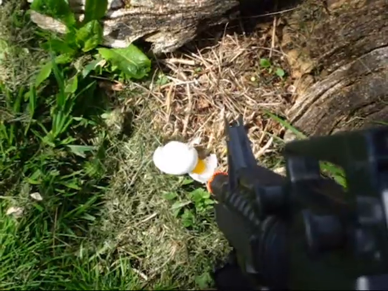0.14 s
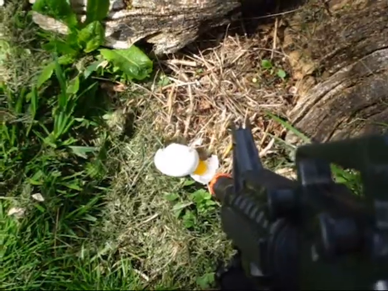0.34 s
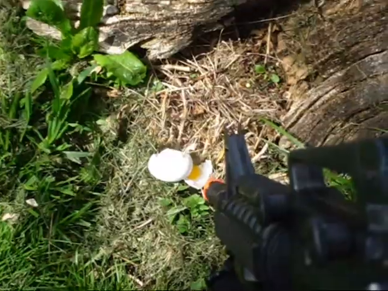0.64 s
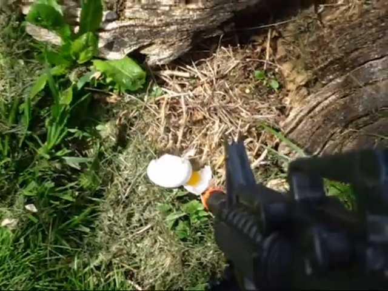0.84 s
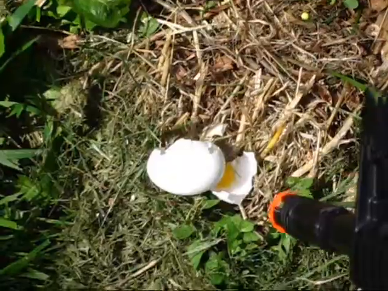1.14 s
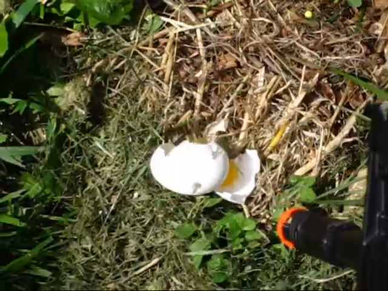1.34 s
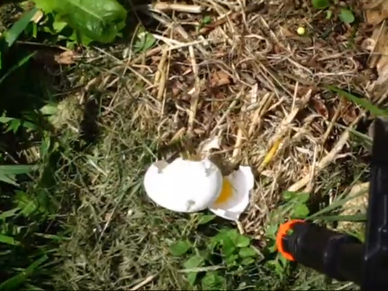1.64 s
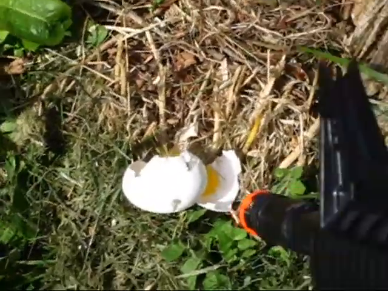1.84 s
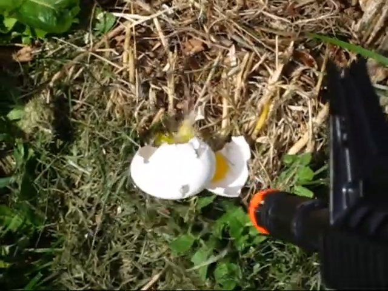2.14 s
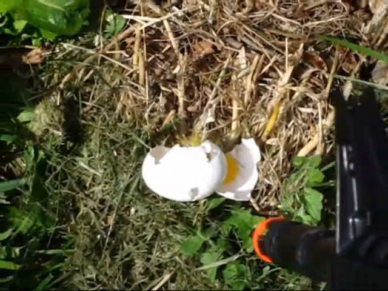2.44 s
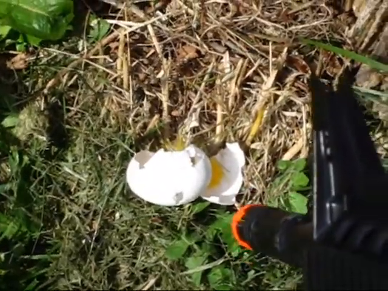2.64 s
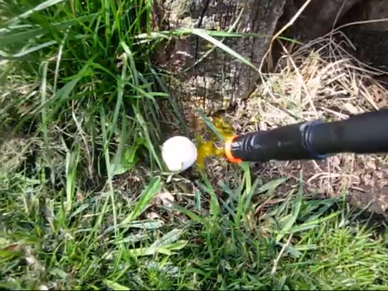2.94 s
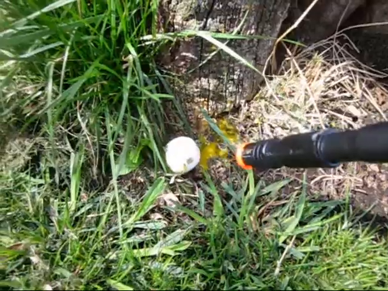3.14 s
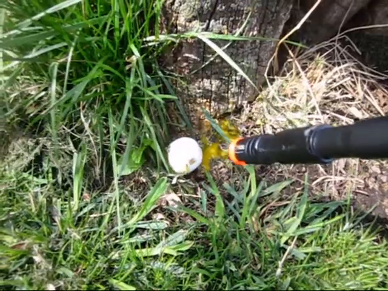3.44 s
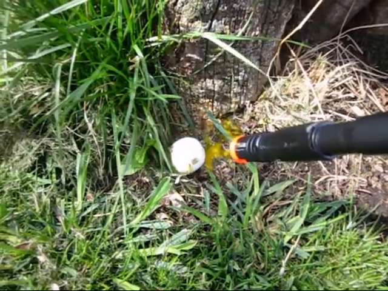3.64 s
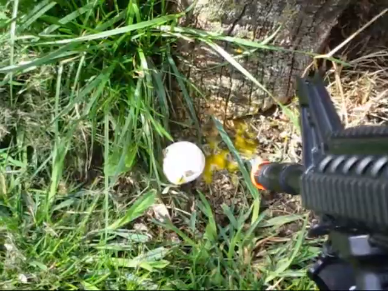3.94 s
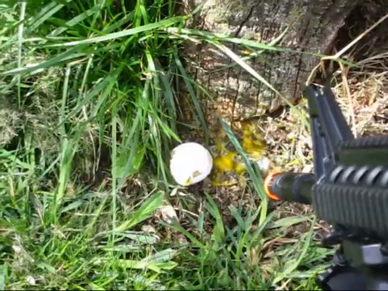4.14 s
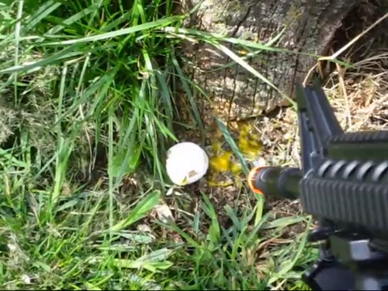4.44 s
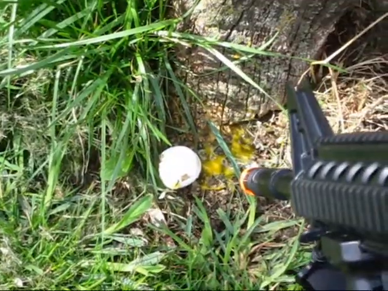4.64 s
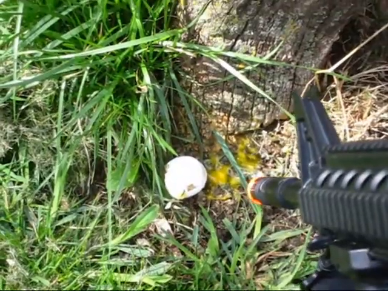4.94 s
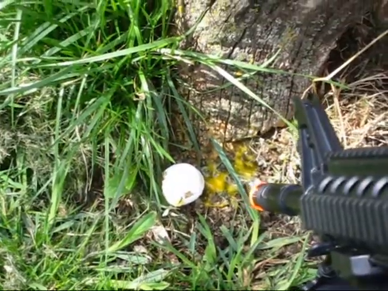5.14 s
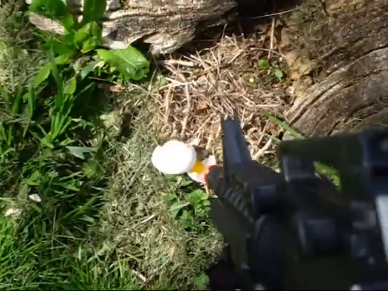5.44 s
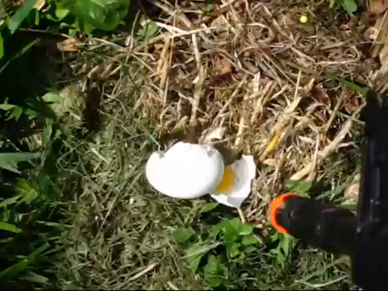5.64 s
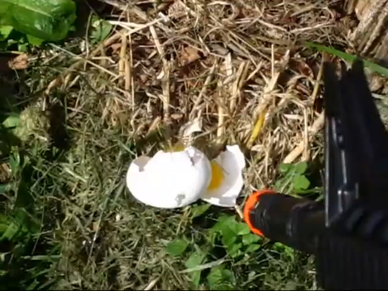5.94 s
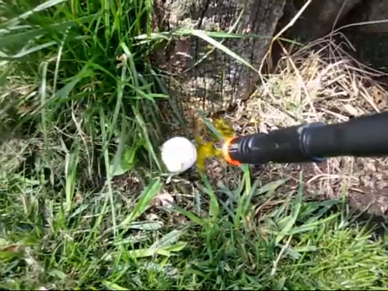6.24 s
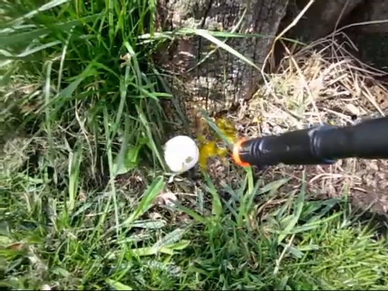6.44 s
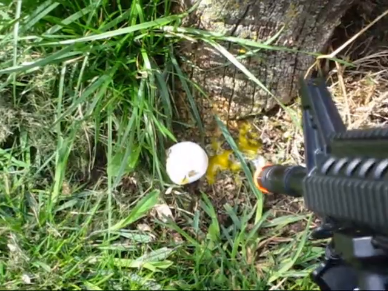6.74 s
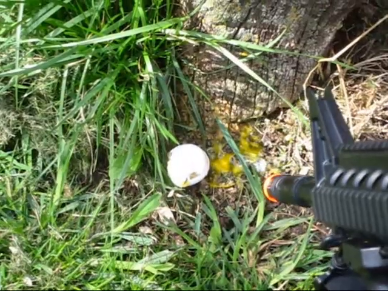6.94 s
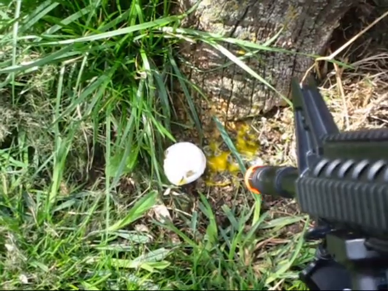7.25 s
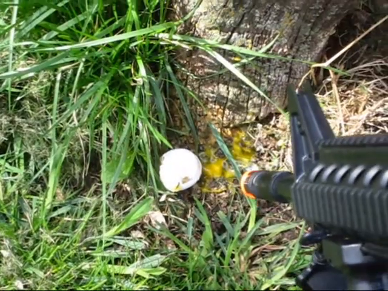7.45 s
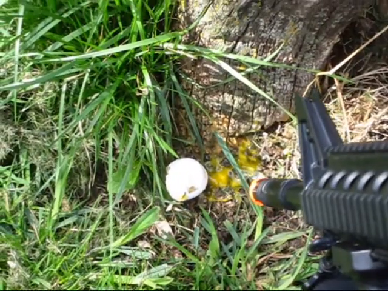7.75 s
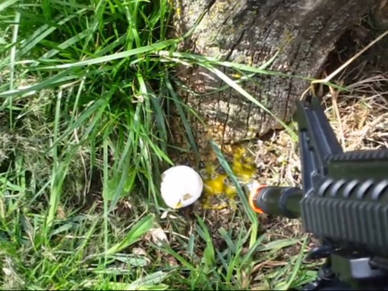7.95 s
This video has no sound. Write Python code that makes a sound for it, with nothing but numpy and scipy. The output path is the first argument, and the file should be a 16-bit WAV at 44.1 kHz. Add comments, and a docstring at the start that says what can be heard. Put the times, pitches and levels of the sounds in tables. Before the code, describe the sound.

An airsoft rifle fires five sharp plastic clacks with metallic spring ring, outdoors up close, then the five shots repeat quickly.

```python
"""A spring airsoft rifle fires five shots on a lawn, right beside the microphone; then all five are repeated.
Each shot is a double clack of the piston in a plastic body (filtered noise), a short buzz of the spring
(noise ticks) and a long faint ring (decaying sines and a haze of weak modes).
An automatic gain control ducks the breeze (filtered noise) at each shot and lets it swell back.
The rifle clicks as it is handled (filtered impulses); a far bird whistles (gliding sines)."""
import sys
import numpy as np
from scipy import signal
from scipy.fft import rfft, irfft
from scipy.io import wavfile
from scipy.ndimage import uniform_filter1d

SR = 44100
rng = np.random.default_rng(int(sys.argv[2]) if len(sys.argv) > 2 else 0)


def file_out(sig):
    """Save sig as 16-bit WAV at sys.argv[1]."""
    # one column per channel
    cols = np.atleast_2d(sig).T
    # limit, then scale
    lim = np.clip(cols, -1, 1)
    pcm = np.round(lim * 32767).astype(np.int16)
    wavfile.write(sys.argv[1], SR, pcm)


N = 357651
TIME_S = np.arange(N) / SR
CUTOFF_HZ = 15600

# sections, each with its own steady breeze: (begins [s], rumble level [dB], rustle level [dB])
SECTIONS = [(0, -49, -45), (1.1, -45.5, -45.5), (2.94, -45, -45.5), (4.016, -42, -44.5)]
# repeats, each running until the next: (begins [s], source time [s])
REPEATS = [(5.44, 0.0006), (5.718, 1.1376), (5.918, 1.9469), (6.317, 2.9569), (6.72, 3.9888)]
SECTION_ENDS = [round(row[0] * SR) for row in SECTIONS[1:] + REPEATS[:1]]  # samples


def from_db(db):
    """Decibels to gain."""
    return 10 ** (np.asarray(db) / 20)


def rms_one(x):
    """Scale to unit power."""
    return x / np.sqrt(np.mean(x ** 2) + 1e-20)


def add(out, start_s, sound):
    """Mix a sound in at start_s, as far as there is room."""
    at = max(round(start_s * SR), 0)
    part = sound[:max(len(out) - at, 0)]
    out[at:at + len(part)] += part


def drift(knots_per_s):
    """Random curve of unit rms: straight lines between random knots."""
    knots = rng.standard_normal(1000)
    return rms_one(np.interp(TIME_S * knots_per_s, np.arange(len(knots)), knots))


def colour(x, spectrum, resonances=(), size=8192):
    """Minimum-phase filter of unit power gain: a smooth spectrum with resonant peaks or dips."""
    hz = np.arange(size // 2 + 1) * SR / size + 1e-3
    points = np.array(spectrum)
    db = np.interp(np.log(hz), np.log(points[:, 0]), points[:, 1])
    for centre_hz, width_hz, peak_db in resonances:
        db = db + peak_db / (1 + (2 * (hz - centre_hz) / width_hz) ** 2)
    # folding the cepstrum makes the response causal
    cepstrum = irfft(np.log(from_db(db)))
    cepstrum[1:size // 2] *= 2
    cepstrum[size // 2 + 1:] = 0
    response = irfft(np.exp(rfft(cepstrum)))
    return signal.fftconvolve(x, response / np.linalg.norm(response))[:len(x)]


def decay(t, start_s, length_s):
    """Sudden rise, exponential fall to 1/e in length_s."""
    return (t >= start_s) * np.exp(-np.maximum(t - start_s, 0) / length_s)


def breeze(lumpy_db=1.5, flutter_db=0.93, rustle_follows=0.21):
    """Eddies rumble on the microphone and stir the grass; gusts swell the rumble far more than the rustle."""
    # gusts: (peak time [s], half-length to 1/e [s], rise [dB])
    gusts = [(1.151, 0.13, 5.5), (2.01, .18, 3), (2.99, .06, 7), (3.697, .09, 5.5), (4.056, 0.035, 8),
             (4.7, 0.18, 1.5)]
    # rumble colour: (frequency [Hz], level [dB])
    rumble_colour = [(15, -47.5), (25, -8.5), (43, -4.5), (65, -2), (81, 2.5), (151, -1), (243, -7),
                     (321, -17.5), (400, -27), (520, -41), (880, -120)]
    # grass rustle colour: (frequency [Hz], level [dB])
    rustle_colour = [(180, -29.5), (300, -1), (1010, -0.5), (2570, -13.5), (2980, -11.5), (3400, -15),
                     (4020, -11.5), (5160, -21), (8090, -18.5), (8640, -21), (13300, -24), (15200, -22.5),
                     (16000, -47.5)]
    section = np.searchsorted(SECTION_ENDS[:-1], np.arange(N), "right")
    _, rumble_db, rustle_db = np.array(SECTIONS)[section].T
    gust_db = sum(db * np.exp(-((TIME_S - peak_s) / length_s) ** 2) for peak_s, length_s, db in gusts)
    eddies = drift(25)
    rumble_gain = from_db(rumble_db + gust_db + lumpy_db * eddies)
    rumble = rumble_gain * colour(rng.standard_normal(N), rumble_colour)
    rustle_gain = from_db(rustle_db + rustle_follows * gust_db + flutter_db * eddies)
    rustle = rustle_gain * colour(rng.standard_normal(N), rustle_colour)
    return (rumble + rustle) * (np.arange(N) < SECTION_ENDS[-1])


def bang(t, side, stretch, bang_db, puff_db, band, puff_s=0.00341, puff_width_s=0.00019, repeat=0.35):
    """The piston's contacts rattle the body, partly alike; the air leaves the muzzle as one N-shaped puff."""
    # sear, piston slam, chatter, rebound, chatter: (unstretched time after release [s], level [dB], decay [s])
    stroke = [(0.0, -9.5, 0.0061), (0.003, 0.5, 0.0048), (0.0068, 0, 0.0039), (0.0142, 1.5, 0.0046),
              (0.0188, -2.5, 0.003)]
    # bang colour from behind: (frequency [Hz], level [dB])
    behind_colour = [(35, -42), (60, -8), (553, -6.5), (822, -2.5), (1550, -3), (2190, 3.5), (2900, -4),
                     (3670, -2.5), (4640, -7.5), (6140, -8), (10000, -12.5), (11300, -20.5), (14600, -15.5),
                     (16000, -12.5)]
    # bang colour from the side, duller: (frequency [Hz], level [dB])
    side_colour = [(35, -15), (80, -6), (240, -5.5), (370, -21.5), (590, -8), (780, -7), (1200, -1),
                   (1500, -14), (2000, -3.5), (2800, -9), (4300, -13.5), (9800, -16.5), (11800, -23),
                   (14600, -16), (16000, -45)]
    # body resonances and hollows from behind: (frequency [Hz], width [Hz], level [dB])
    behind_body = [(467, 57, 5), (669, 21, 6.5), (811, 33, 8), (1310, 140, -1.5), (1623, 55, -5.5),
                   (1820, 170, 3.5), (1915, 63, 2.5), (2250, 130, -4), (2600, 120, -2), (3090, 73, -0.5),
                   (3530, 140, 1), (4090, 190, 5), (4340, 60, 5), (4850, 74, 3), (5750, 78, 9.5),
                   (6280, 56, 7)]
    # body resonances and hollows from the side: (frequency [Hz], width [Hz], level [dB])
    side_body = [(262, 51, 8.5), (457, 60, 5), (754, 48, 7.5), (1120, 200, 5), (1530, 140, -15),
                 (1900, 160, 8), (1980, 140, 2.5), (2670, 100, 10.5), (3120, 120, 8.5), (5160, 82, 11),
                 (6430, 70, -8), (8610, 61, 13)]
    alike = np.clip(repeat, 0, 1)
    force = np.zeros(len(t))
    common = rng.choice([-1, 1], len(t))
    for contact_s, db, length_s in stroke:
        grain = np.sqrt(alike) * common + np.sqrt(1 - alike) * rng.choice([-1, 1], len(t))
        add(force, contact_s * stretch, from_db(db) * grain * decay(t, 0, length_s))
    force *= np.minimum(t / stroke[1][0], 1)  # the scrape grows as the piston gathers speed
    spectrum, body = (side_colour, side_body) if side > .5 else (behind_colour, behind_body)
    rattle = from_db(bang_db) * colour(force, spectrum, [*body, band])
    u = (t - puff_s) / puff_width_s
    puff = -from_db(puff_db) * u * np.exp((1 - u ** 2) / 2)
    return rattle + puff


def buzz_envelope(t, attack_s=0.019, settles_s=0.094):
    """The slack spring's buzz builds up, is kicked by the rebound, thrashes until it settles, then trembles."""
    rise_db_per_s, kick_fall_db_per_s, fall_db_per_s, settle_db_per_s = 1550, 600.5, 92.5, 323
    kick_db, thrash_db, tremor_db = 5.5, 1.5, -10.5
    early_s, late_s = np.maximum(attack_s - t, 0), np.maximum(t - attack_s, 0)
    settled_s = np.maximum(t - settles_s, 0)
    kick = from_db(kick_db - kick_fall_db_per_s * late_s)
    thrash = from_db(thrash_db - fall_db_per_s * late_s - settle_db_per_s * settled_s)
    tremor = from_db(tremor_db - fall_db_per_s * late_s)
    return from_db(-rise_db_per_s * early_s) * np.sqrt(kick ** 2 + thrash ** 2 + tremor ** 2)


def buzz(t, side, clash_hz=85, throb_db=0.2, grain_db=2.0):
    """The coils clash in dense ticks, in slight surges as the spring swings to and fro."""
    # buzz colour from behind: (frequency [Hz], level [dB])
    behind_colour = [(150, -47.5), (250, -14.5), (460, -9.5), (618, 0), (674, -3.5), (831, 0.5),
                     (922, -9.5), (1040, -4.5), (3770, -3), (4340, -2), (7840, -7), (10400, -16.5),
                     (14900, -16), (16000, -13.5)]
    # buzz colour from the side: (frequency [Hz], level [dB])
    side_colour = [(150, -40), (250, -16), (476, -12), (519, -2.5), (566, -15), (618, -1), (674, 1.5),
                   (1330, -5.5), (1980, -0.5), (3120, -6.5), (3460, 0.5), (4340, -8), (8700, -12),
                   (16000, -20.5)]
    noise = rng.standard_normal(len(t))
    grain = np.repeat(rng.standard_normal(len(t)), 24)[:len(t)]  # held for 24 samples
    ticks = rms_one(noise * from_db(grain_db * grain))
    surge_db = throb_db * np.sin(2 * np.pi * (clash_hz * t + rng.random()))
    return colour(ticks * buzz_envelope(t) * from_db(surge_db), side_colour if side > .5 else behind_colour)


def spring_ring(t, modes, spread_db=2.0):
    """Long decaying modes of the spring, each struck with a random strength and phase."""
    chance = rng.standard_normal((len(modes), 2))
    ring = np.zeros(len(t))
    for (hz, rms_db, t60_s), (strength, phase) in zip(modes, chance):
        gain = np.sqrt(2) * from_db(rms_db + spread_db * strength - 60 * t / t60_s)
        ring += gain * np.sin(2 * np.pi * (hz * t + phase))
    return ring


def shimmer(t, level_db=-34, t60_s=1.84, count=700):
    """Hundreds of weak coil modes blur into a metallic haze."""
    # haze colour: (frequency [Hz], level [dB])
    haze_colour = [(400, -41), (700, -19), (1400, -5), (2200, -1.5), (3500, -5), (6000, -22.5),
                   (9000, -9.5), (12000, -19.5), (15000, -17), (16000, -31.5)]
    # bands where the coil modes crowd: (frequency [Hz], width [Hz], level [dB])
    coil_bands = [(2250, 200, 3), (4560, 450, 7.5), (7520, 600, 10.5)]
    lines = np.zeros(len(t) // 2 + 1, complex)
    at = (rng.random(count) * len(lines)).astype(int)
    lines[at] = rng.standard_normal(count) + 1j * rng.standard_normal(count)
    haze = rms_one(colour(irfft(lines, len(t)), haze_colour, coil_bands))
    return haze * from_db(level_db - 60 * t / t60_s)


def shots(band_width=0.45):
    """Each shot favours one body band and one spring mode; its ring is cut off where the section ends."""
    # shots: (time [s], bang level [dB], heard from behind 0 or side 1, stroke duration factor, puff level [dB],
    #   buzz level [dB], ring level [dB], favoured spring mode [Hz], its boost [dB],
    #   favoured body band [Hz], its boost [dB])
    shot_rows = [(0.0109, 10.5, 0, 0.95, 1.5, -10, -4.5, 710.6, 12.5, 1600, 4),
                 (1.2103, 8.5, 0, 0.94, -1, -12, -1.5, 1415, 7, 800, 1.5),
                 (2.1740, 11.5, 0, 1.09, 5, -5.5, -11, 1911, 17.5, 4800, -0.5),
                 (3.0708, 10.5, 1, 0.92, 13.5, -9, 2, 1415, 19, 3300, 2.5),
                 (4.0617, 7, 0, 0.99, 6, -9, 1, 850.6, 8, 248, 11)]
    # spring modes: (frequency [Hz], level from behind [dB], level from the side [dB], t60 [s])
    spring_modes = [(710.6, -51.5, -51, 2.7), (850.6, -39.5, -45, 1.78), (861.3, -45.5, -42, 1),
                    (984, -46.5, -45.5, 1.5), (1060, -42.5, -50, 1.2), (1138, -43.5, -67, 3.2),
                    (1266, -40.5, -58, 1.5), (1415, -44.5, -55.5, 1.69), (1810, -44, -28.5, 0.77),
                    (1911, -46, -45, 1.84), (2060, -50, -30, 0.78), (2200, -48.5, -32, 1.35),
                    (2190, -48, -38, 0.61), (2254, -46, -55, 2.95), (2455, -50, -52, 1.1),
                    (2640, -42.5, -42, 1.34), (2780, -53, -42, 1.34), (3550, -47.5, -40, 1.06),
                    (3700, -54, -44, 1.3), (4100, -41.5, -56, 1.5), (4360, -52.5, -60, 1.4),
                    (4560, -38, -52, 0.98), (4800, -43.5, -48, 1.4), (7200, -48, -57, 1.4),
                    (7590, -51, -57, 1.2), (8300, -53, -48, 1.5), (9733, -61, -49, 1.5),
                    (10866, -48, -54, 1.7), (14266, -59, -49, 1.6)]
    out, t = np.zeros(N), TIME_S[:SR * 3 // 2]
    hz, behind_db, side_db, t60_s = np.transpose(spring_modes)
    for (start_s, bang_db, side, stretch, puff_db, buzz_db, ring_db,
         tone_hz, boost_db, band_hz, band_db) in shot_rows:
        favoured = np.arange(len(hz)) == np.argmin(np.abs(hz - tone_hz))
        mode_db = (side_db if side > .5 else behind_db) + boost_db * favoured
        ring = from_db(ring_db) * spring_ring(t, np.transpose([hz, mode_db, t60_s])) + shimmer(t)
        band = (band_hz, band_width * band_hz, band_db)
        clack = bang(t, side, stretch, bang_db, puff_db, band)
        shot = clack + from_db(buzz_db) * buzz(t, side) + ring
        end = min(end for end in SECTION_ENDS if end > start_s * SR)
        add(out[:end], start_s, shot)
    return out


def bird(droop=.08):
    """Thin far whistles that lift a little, then fall away."""
    # whistles: (time [s], length [s], highest pitch [Hz], level [dB])
    whistles = [(0.882, 0.093, 3870, -52), (1.86, .14, 3750, -56), (4.677, 0.24, 3420, -55)]
    out = np.zeros(N)
    for start_s, length_s, hz, db in whistles:
        u = np.linspace(0, 1, round(length_s * SR))
        pitch_hz = hz * (1 - droop * (1.9 * u - .5) ** 2)
        add(out, start_s, from_db(db) * np.sin(np.pi * u) * np.sin(2 * np.pi * np.cumsum(pitch_hz) / SR))
    return out


def slips(count=3, last_s=3.8672, gap_s=0.0122):
    """A stiff part slips before it snaps home: a run of scraping clicks that grow louder and brighter."""
    last_db, step_db, decay_s = -21.5, 6, 0.0085
    dull_hz, dull_ratio = 9000, 0.48
    ring_hz, ring_db = 1260, 1
    # counted back from the last slip
    return [(last_s - k * gap_s, last_db - k * step_db, dull_hz * dull_ratio ** k, decay_s, ring_hz, ring_db)
            for k in range(count)]


def clicks(scrape=0.36, ring_width_hz=220, size=88):
    """Plastic parts snap, scrape and ring briefly, each at a pitch of its own; soft contacts are dull."""
    # trigger and handling: (time [s], peak short-term rms [dB], dull above [Hz], scrape decay [s],
    #   ring [Hz], ring strength [dB])
    handling = [(1.408, -33, 9000, 0.0028, 4460, 8), (1.592, -20, 1300, 0.0029, 1170, 13),
                (2.153, -27, 8000, 0.018, 840, 8), (2.482, -34, 5000, .008, 1610, 4),
                (2.6637, -20, 9000, 0.0024, 2900, 5), (3.326, -28, 990, .005, 800, 8),
                (3.8765, -14, 10900, 0.0012, 1600, 10), (3.921, -33.5, 3000, 0.0025, 1000, 19),
                (3.9634, -24, 2600, 0.0018, 2200, 12), (4.019, -28, 9000, .004, 1200, 8),
                (4.8850, -16.5, 600, 0.00071, 352, 4), (4.8866, -13, 9000, 0.0018, 2050, 7.5),
                (6.7418, -25.5, 9000, 0.0017, 1900, 18)]
    # click colour: (frequency [Hz], level [dB])
    click_colour = [(80, -19), (200, -2), (600, -2.5), (1200, -0.5), (2000, -3), (3200, -3), (5500, -16.5),
                    (9000, -9), (12000, -13), (14500, 1), (16000, -17)]
    # body resonances and hollows: (frequency [Hz], width [Hz], level [dB])
    click_body = [(418, 75, -1.5), (870, 74, 4.5), (1640, 150, 4), (2430, 310, -3), (3300, 600, 4),
                  (9940, 260, 4), (14030, 370, 4)]
    out, t = np.zeros(N), TIME_S[:SR // 10]
    for start_s, db, dull_hz, length_s, ring_hz, ring_db in handling + slips():
        force = (t == 0) + scrape * rng.standard_normal(len(t)) * decay(t, 0, length_s)
        lowpass = signal.butter(2, min(dull_hz, CUTOFF_HZ), fs=SR, output="sos")
        force = signal.sosfilt(lowpass, force)
        click = colour(force, click_colour, [*click_body, (ring_hz, ring_width_hz, ring_db)])
        loudest = np.sqrt(uniform_filter1d(click ** 2, size).max())
        add(out, start_s, from_db(db) * click / loudest)
    return out


def scene():
    """Rifle and lawn, in mono."""
    return (shots() + clicks() + breeze() + bird())[None]


def gain_control(x, threshold_db=-19.5, release_db_per_s=33.5, sense_hz=4500,
                 lag_s=0.00094, attack_s=0.0028, size=300):
    """Loud treble pulls the gain down at once; it creeps back, and starts afresh at each section."""
    sensed = signal.sosfilt(signal.butter(1, sense_hz, "high", fs=SR, output="sos"), x)
    power = np.maximum(uniform_filter1d(sensed ** 2, size), 1e-12)
    over_db = np.maximum(10 * np.log10(power) - threshold_db, 0)
    over_db = np.interp(TIME_S - lag_s, TIME_S, over_db)
    # a running maximum against a rising ramp gives a linear release
    ramp_db = release_db_per_s * TIME_S
    pieces = np.split(over_db + ramp_db, SECTION_ENDS)
    cut_db = np.concatenate([np.maximum.accumulate(p) for p in pieces]) - ramp_db
    return x * from_db(-uniform_filter1d(cut_db, max(round(attack_s * SR), 1)))


def replay(x):
    """The five shots come round again, in short pieces laid end to end."""
    out = x.copy()
    ends = [round(start_s * SR) for start_s, _ in REPEATS[1:]] + [N]
    for (start_s, source_s), end in zip(REPEATS, ends):
        add(out[:end], start_s, x[round(source_s * SR):])
    return out


def fades(fade_out_s=0.016, fade_in_s=0.003, floor_db=-58):
    """Gain with quick linear fades into and out of each near-silence."""
    # near-silences: (fade-out ends [s], fade-in begins [s])
    silences = [(1.0, 1.112), (8.102, 8.2)]
    gain = np.ones(N)
    for begins_s, ends_s in silences:
        slope = np.maximum((begins_s - TIME_S) / fade_out_s, (TIME_S - ends_s) / fade_in_s)
        gain *= np.clip(slope, from_db(floor_db), 1)
    return gain


def record(dry, hiss_db=-55, offset=-0.0091, top=0.57):
    """Gain control, rounded peaks, the repeats, hiss and a constant offset, fades, then a steep lowpass."""
    # hiss colour: (frequency [Hz], level [dB])
    hiss_colour = [(120, -27), (200, -8.5), (500, -14), (709, -10), (1210, -4), (4040, -10), (4600, -5),
                   (11900, -23), (14900, -18.5), (16000, -36.5)]
    rounded = top * np.tanh(gain_control(dry[0]) / top)
    sound = replay(rounded)
    hiss = from_db(hiss_db) * colour(rng.standard_normal(N), hiss_colour)
    sound = (sound + hiss + offset) * fades()
    return signal.sosfilt(signal.ellip(10, .1, 70, CUTOFF_HZ, fs=SR, output="sos"), sound)[None]


dry = scene()
out = record(dry)
file_out(out)
```